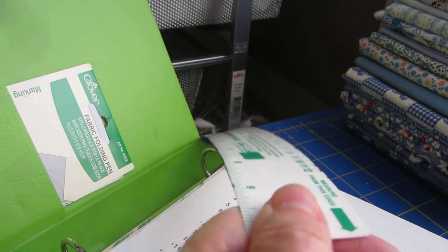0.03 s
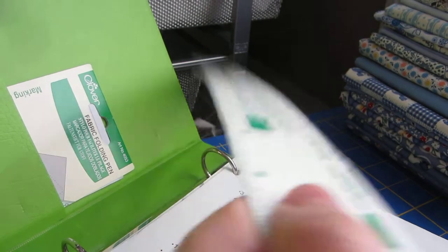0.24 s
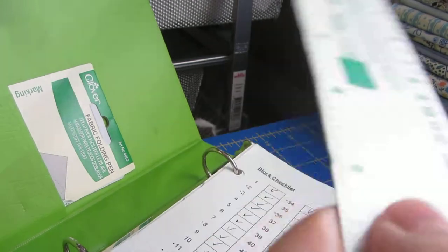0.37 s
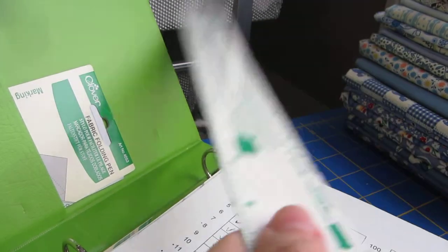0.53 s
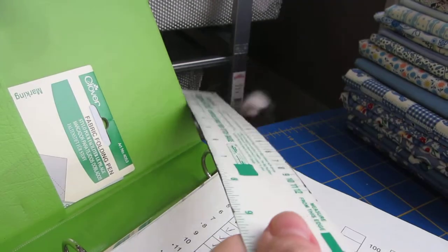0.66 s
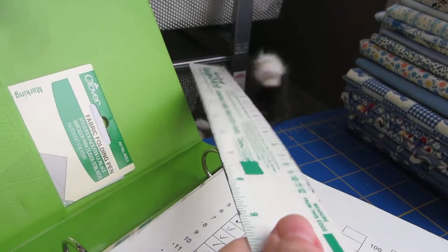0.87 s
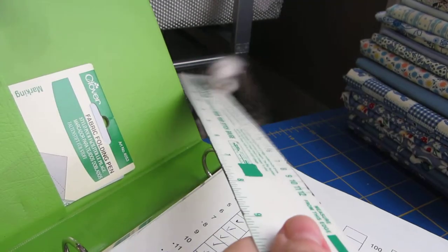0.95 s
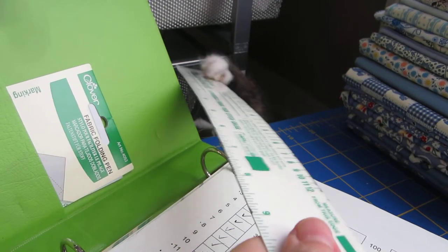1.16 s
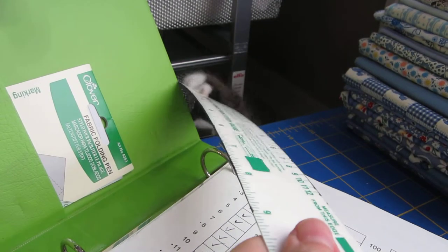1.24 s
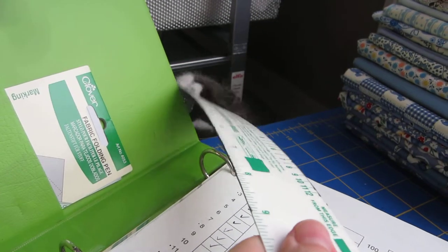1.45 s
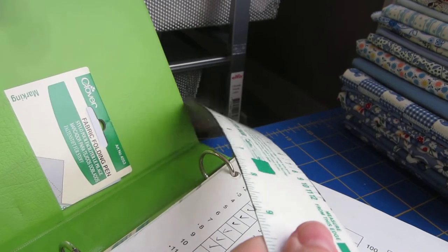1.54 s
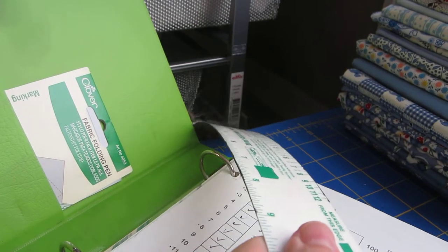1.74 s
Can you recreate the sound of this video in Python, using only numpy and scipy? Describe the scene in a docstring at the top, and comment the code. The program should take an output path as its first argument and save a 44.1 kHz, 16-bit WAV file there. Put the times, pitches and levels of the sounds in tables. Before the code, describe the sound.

A plastic ruler gives one dry crack as it flicks off a ring binder. Irregular clicking taps, a few hollow knocks and light scraping on the cover follow, close to the microphone in a quiet room.

```python
"""A bent plastic ruler slips off the edge of a ring binder with a sharp snap, swings back and taps the
cover, then skips and scrapes down it. Each snap or tap sends a bending wave along the ruler, treble
first; some taps also knock the hollow cover, which rumbles as it flexes. The scrape is a stream of
tiny slips of plastic on plastic. Heard close up in a small quiet room."""
import sys
import numpy as np
from scipy import signal
from scipy.fft import rfft, irfft, next_fast_len
from scipy.io import wavfile
from scipy.ndimage import uniform_filter1d

SR = 44100
rng = np.random.default_rng(int(sys.argv[2]) if len(sys.argv) > 2 else 0)


def wav_out(sig):
    """Save sig, one row per channel (or a flat mono array), as 16-bit PCM at SR to the path in sys.argv[1]."""
    wavfile.write(sys.argv[1], SR, np.round(np.clip(np.atleast_2d(sig).T, -1, 1) * 32767).astype(np.int16))


N = 79380

# Room tone spectrum. Each row: frequency in Hz, gain in dB.
ROOM_TONE_SPECTRUM = [(20, -17.5), (60, 6), (90, -6.5), (170, -2.5), (400, -13), (1000, -15.5),
                      (2400, -23.5), (8000, -25.5), (16000, -38)]
# Strokes of the sliding tip. Each row: start in seconds, length in seconds, body level and hiss level
# in dB before their trims, contact resonance in Hz.
STROKES = [(0.008, 0.045, -44.5, -47.5, 1740), (0.049, 0.12, -48, -48.5, 1660),
           (0.587, .016, -26, -37, 1090), (1.01, 0.072, -33.5, -44, 1460), (1.098, 0.039, -40, -53.5, 1380),
           (1.189, 0.13, -43, -52.5, 1510), (1.303, 0.049, -31.5, -40, 1520),
           (1.46, 0.056, -31.5, -31.5, 1870), (1.53, 0.021, -34.5, -30.5, 2030),
           (1.549, 0.068, -37, -41.5, 1780), (1.599, 0.058, -41, -38, 2040),
           (1.656, 0.0095, -35, -40.5, 1760), (1.688, 0.062, -36.5, -39, 2050)]
# Resonances common to all strokes. Each row: centre in Hz, width in Hz, gain in dB.
SCRAPE_RESONANCES = [(337, 120, 0), (510, 69, 2), (1090, 160, -2.5), (1650, 600, -7)]
# Hard skids of the tip. Each row: start in seconds, length in seconds, level in dB.
TIP_SKIDS = [(0.598, 0.0056, -32), (1.033, 0.0023, -38), (1.332, 0.0046, -38.5)]
# Spectra of the scrape's hiss and of a skid. Each row: frequency in Hz, gain in dB.
HISS_SPECTRUM = [(800, -4.5), (1700, -2), (2650, -2.5), (3800, 3), (5400, 0), (6300, -5), (7300, -13.5),
                 (9800, -15), (15500, -28)]
SKID_SPECTRUM = [(1000, -10.5), (3300, 1), (9000, -3.5), (15500, -23.5)]
# Taps of the tip. Each row: start in seconds, gain in dB, bass, treble and top gains in dB,
# body resonance in Hz, treble resonance in Hz, bending-wave sweep in seconds.
TIP_TAPS = [(0.0229, -0.5, -1.5, 0, -14, 1050, 3410, 0.0031), (0.5875, -1.5, 16, 7, 5, 1270, 3580, 0.00078),
            (0.6004, 13, -6, -9.5, -2, 1770, 3630, 0.001456),
            (0.6729, 7, -1.5, -7, -10, 1420, 3900, 0.0013), (0.682, -6.5, 5, -3.5, 4, 1300, 4200, 0.0028),
            (0.7196, -6, -6.5, -1.5, 4, 1375, 3870, 0.0028),
            (0.7361, -17.5, 2.5, 10.5, 14.5, 1860, 5900, 0.0022),
            (0.8581, 2, 3, -11, -5.5, 1545, 4730, 0.0027), (0.8642, 2, -2.5, 3.5, 3.5, 1630, 4640, 0.0033),
            (0.9797, -11.5, -2, 9.5, 10.5, 1750, 3480, 0.0011),
            (0.9917, 11, -6.5, -7.5, 0, 1590, 4100, 0.0026),
            (1.2135, 13, -0.5, -7.5, -11, 1480, 5140, 0.0028),
            (1.2228, 7.5, -15, -5, -14.5, 1390, 5160, 0.00222),
            (1.229, 2.5, -4.5, 3.5, -3, 1500, 2570, 0.00083), (1.3478, -6, -11, 9, 4.5, 1750, 5530, 0.0009),
            (1.4047, 6.5, -20, 2, -14, 1850, 3440, 0.0013), (1.4291, 20, -1, -5, -1, 1580, 4480, 0.0024),
            (1.4367, 10, 0, 6, -2, 1360, 2690, 0.0019), (1.706, 4.5, -10, 1, 0, 1890, 2780, 0.00053),
            (1.7592, 6, -12.5, -2.5, -5, 1600, 2470, 0.00019)]
# Spectrum of the tapped ruler. Each row: frequency in Hz, gain in dB.
RULER_SPECTRUM = [(60, -8), (250, -10), (470, -2.5), (680, -4.5), (1050, -6), (1800, -4.5), (2300, -7),
                  (3700, -14.5), (5500, -15), (7300, -25.5), (10000, -27), (15500, -41)]
# Knocks on the cover. Each row: start in seconds, gain in dB, tilt in dB per octave about 300 Hz.
COVER_KNOCKS = [(.023, -42, -3), (0.226, -32.5, 18), (.588, -30.5, 10.5), (0.602, -32.5, -6),
                (.994, -26.5, 4), (1.216, -29, 7), (1.224, -28, 11.5), (1.431, -28.5, 16),
                (1.437, -25, 1.5)]
# Modes of the cover. Each row: frequency in Hz, gain in dB, T60 in seconds.
COVER_MODES = [(120, -5, 0.11), (188, -1, 0.084), (320, 4.5, 0.041), (444, -11.5, 0.058),
               (637, -15.5, 0.031), (1123, -29, 0.077)]
# Snap spectra: direct, and evened out over all directions. Each row: frequency in Hz, gain in dB.
SNAP_DIRECT_SPECTRUM = [(40, -11.5), (120, 2), (300, -10), (450, 1), (680, -13), (850, 0.5), (1400, 5.5),
                        (1530, -11), (1680, 2), (2200, -13.5), (3000, 3), (3230, -8), (3550, 9.5),
                        (4050, -1), (4400, -7), (5400, -12.5), (6000, -3), (6700, -16.5), (8300, -7),
                        (9000, -16), (14500, -22.5), (16000, -37)]
SNAP_DIFFUSE_SPECTRUM = [(200, -7), (1350, 2.5), (2200, -8.5), (3700, -2.5), (6000, -11.5), (15500, -29)]
# Envelope of the flexing cover. Each row: time in seconds, level in dB before the trim.
FLEX_ENVELOPE = [(0.951, -56), (1.02, -52), (1.17, -59), (1.401, -63), (1.48, -56), (1.6, -53), (1.8, -60)]
# Spectrum of the flexing cover. Each row: frequency in Hz, gain in dB.
FLEX_SPECTRUM = [(20, -27.5), (48, 4.5), (90, -11.5), (170, 0.5), (300, -19), (700, -50), (2000, -110)]
# Decay of the wall reflections. Each row: frequency in Hz, T60 in seconds.
WALL_DECAY = [(100, 0.11), (500, 0.07), (1500, 0.093), (4000, 0.3), (12000, 0.15)]
# Colour of all reflections. Each row: frequency in Hz, gain in dB.
REFLECTION_SPECTRUM = [(200, 21), (1400, 6), (3000, -2), (10000, -1)]


def amp(db):
    """Decibels to gain."""
    return 10 ** (np.asarray(db) / 20)


def unit_rms(x):
    """Scale to rms 1."""
    return x / np.sqrt(np.mean(x ** 2) + 1e-20)


def along(points, hz):
    """Interpolate (Hz, value) points on a log-frequency axis."""
    point_hz, values = np.transpose(points)
    return np.interp(np.log(hz + 1), np.log(point_hz + 1), values)


def bell(hz, centre_hz, octaves=0.22):
    """Bell curve on a log-frequency axis."""
    return np.exp(-(np.log2((hz + 1) / centre_hz) / octaves) ** 2)


def filtered(x, response):
    """Apply a gain given as a function of Hz."""
    size = next_fast_len(N + SR // 2)
    return irfft(rfft(x, size) * response(np.fft.rfftfreq(size, 1 / SR)), size)[:N]


def coloured(x, spectrum):
    """Apply a (Hz, dB) spectrum."""
    return filtered(x, lambda hz: amp(along(spectrum, hz)))


def noise(spectrum):
    """Coloured noise, rms 1."""
    return unit_rms(coloured(rng.standard_normal(N), spectrum))


def burst(t60_s, size=4096):
    """Decaying noise, energy 1."""
    x = rng.standard_normal(size) * amp(-60 * np.arange(size) / SR / t60_s)
    return x / np.linalg.norm(x)


def add(track, start_s, sound):
    """Mix a sound into the track in place."""
    part = track[max(round(start_s * SR), 0):][:len(sound)]
    part += sound[:len(part)]


def swell(start_s, length_s, rise_share=0.28, fall_share=0.31):
    """Rise, hold and fall of one stroke."""
    progress = (np.arange(N) / SR - start_s) / length_s
    return np.clip(progress / rise_share, 0, 1) * np.clip((1 - progress) / fall_share, 0, 1)


def room_tone(level_db=-56):
    """Steady hiss and low rumble."""
    return amp(level_db) * noise(ROOM_TONE_SPECTRUM)


def slips(rate_per_s=2500, spread_db=5.5):
    """Tiny irregular slips of plastic on plastic, over a smooth rub."""
    onsets = rng.random(N) < rate_per_s / SR
    grains = onsets * amp(spread_db * rng.standard_normal(N)) * rng.choice([-1, 1], N)
    return unit_rms(grains) + 0.44 * rng.standard_normal(N)


def rub(resonances, order=1):
    """Slips ring through (Hz, width Hz, dB) resonances, rms 1; a higher order steepens the flanks."""
    def response(hz):
        total = 0
        for k, (centre_hz, width_hz, db) in enumerate(resonances):
            damping = 1j * hz * width_hz
            total += (-1) ** k * amp(db) * damping / (centre_hz ** 2 - hz ** 2 + damping)
        return total ** order
    return unit_rms(filtered(slips(), response))


def rasp(spectrum, grit_db=3):
    """Gritty treble of the slips, rms 1: brief resonances come and go as the contact point moves."""
    frames = signal.stft(slips(), nperseg=256)[2]
    patches = uniform_filter1d(rng.standard_normal(frames.shape), size=4, axis=0)
    patches = unit_rms(uniform_filter1d(patches, size=5, axis=1))
    grit = signal.istft(frames * amp(grit_db * patches), nperseg=256)[1][:N]
    return unit_rms(coloured(grit, spectrum))


def scrape(body_trim_db=-7.5, hiss_trim_db=-2.5, contact_db=4.5, contact_width_hz=590,
           slide_from_s=1.44, slide_db=-52):
    """The tip slides in short strokes, each with its own contact resonance, and now and then skids."""
    slide_gain = amp(slide_db) * (np.arange(N) / SR > slide_from_s)  # tip stays lightly on the cover
    body = slide_gain * rub(SCRAPE_RESONANCES)
    hiss_gain = slide_gain
    for start_s, length_s, body_db, hiss_db, contact_hz in STROKES:
        envelope = swell(start_s, length_s)
        common_ring = rub(SCRAPE_RESONANCES)
        contact_ring = amp(contact_db) * rub([(contact_hz, contact_width_hz, 0)], order=2)
        body += envelope * amp(body_db + body_trim_db) * unit_rms(common_ring + contact_ring)
        hiss_gain = np.maximum(hiss_gain, envelope * amp(hiss_db + hiss_trim_db))
    skid_gain = sum(amp(db) * swell(start_s, length_s) for start_s, length_s, db in TIP_SKIDS)
    return body + hiss_gain * rasp(HISS_SPECTRUM) + skid_gain * rasp(SKID_SPECTRUM)


def bending_wave(colour_db, sweep_s, crunch_hz, crunch_t60_s, chatter_gain=0, size=4096):
    """One contact, dispersed so the lows arrive late: a push below crunch_hz, a crunch above it."""
    hz = np.fft.rfftfreq(size, 1 / SR)
    cepstrum = irfft(np.log(amp(colour_db(hz))))
    cepstrum[1:size // 2] *= 2  # fold to minimum phase
    cepstrum[size // 2 + 1:] = 0
    colour = np.exp(rfft(cepstrum))
    delay_s = sweep_s / (1 + (hz / 2800) ** 2)
    dispersion = np.exp(-2j * np.pi * np.cumsum(delay_s) * SR / size)
    push_share = 1 / (1 + (hz / crunch_hz) ** 4)
    crunch = np.sqrt(1 - push_share) * rfft(burst(crunch_t60_s))
    chatter = chatter_gain * rfft(burst(t60_s=0.024))  # the tip buzzes after contact
    force = np.sqrt(push_share) + crunch + chatter
    fade = np.cos(np.linspace(0, np.pi / 2, size))
    return irfft(force * dispersion * colour) * fade


def taps(crunch_hz=3000, chatter_db=-11):
    """The tip strikes the cover; where and how it lands sets two resonances and a dip below each."""
    out = np.zeros(N)
    for start_s, db, bass_db, treble_db, top_db, body_hz, treble_hz, sweep_s in TIP_TAPS:
        tone = [(500, bass_db), (1200, 0), (1800, 0),
                (3500, treble_db), (5500, treble_db), (8000, top_db)]

        def colour_db(hz):
            peaks_db = 8 * bell(hz, body_hz, octaves=0.13) + 6 * bell(hz, treble_hz)
            dips_db = -8 * bell(hz, 0.58 * body_hz) - 13 * bell(hz, 0.69 * treble_hz)
            return along(RULER_SPECTRUM, hz) + along(tone, hz) + peaks_db + dips_db

        crunch_t60_s = 0.013 * 0.5 ** (db / 22)  # light taps scuff for longer
        wave = bending_wave(colour_db, sweep_s, crunch_hz, crunch_t60_s, amp(chatter_db))
        add(out, start_s, amp(db) * wave)
    return out


def cover_knocks(attack_s=0.0015):
    """The hollow cover's modes ring briefly when knocked."""
    out = np.zeros(N)
    t = np.arange(SR // 3) / SR
    attack = 1 - np.exp(-t / attack_s)
    for start_s, db, tilt_db_per_octave in COVER_KNOCKS:
        ring = 0
        for hz, mode_db, t60_s in COVER_MODES:
            onset_db = mode_db + rng.normal(0, 1) + tilt_db_per_octave * np.log2(hz / 300)
            ring += amp(onset_db - 60 * t / t60_s) * np.sin(2 * np.pi * hz * t)
        add(out, start_s, amp(db) * ring * attack)
    return out


def snap(spectrum, release_s=0.2283, release_db=16.5):
    """The tip catches once, then flies off the edge with a dry crack."""
    out = np.zeros(N)
    catch = (release_s - 0.001, release_db - 8)
    for start_s, db in [catch, (release_s, release_db)]:
        crack = bending_wave(lambda hz: along(spectrum, hz),
                             sweep_s=0.0012, crunch_hz=7500, crunch_t60_s=0.007)
        add(out, start_s, amp(db) * crack)
    return out


def cover_flex(trim_db=-1):
    """Low rumble of the cover giving way under the ruler."""
    times_s, levels_db = np.transpose(FLEX_ENVELOPE)
    envelope_db = np.interp(np.arange(N) / SR, times_s, levels_db, left=-120, right=-120)
    return amp(envelope_db + trim_db) * noise(FLEX_SPECTRUM)


def reflections(x, wall_db=-24, desk_db=-14, scatter_hz=2000):
    """A faint tail from the walls and quick treble scatter from small things on the desk."""
    hz, t, frames = signal.stft(rng.standard_normal(SR // 2), SR, nperseg=256)
    decay = amp(-60 * t / along(WALL_DECAY, hz)[:, None])
    tail = signal.istft(frames * decay, SR, nperseg=256)[1]
    highpass = signal.butter(2, scatter_hz, 'high', fs=SR)
    scatter = signal.lfilter(*highpass, burst(t60_s=0.055))
    impulse_response = np.zeros(SR // 2)
    add(impulse_response, 0.007, amp(wall_db) * tail / np.linalg.norm(tail))
    add(impulse_response, 0.003, amp(desk_db) * scatter)
    return coloured(signal.fftconvolve(x, impulse_response)[:N], REFLECTION_SPECTRUM)


def scene():
    """Ruler and binder in the room, mono."""
    binder = taps() + cover_knocks() + scrape() + cover_flex()
    direct = snap(SNAP_DIRECT_SPECTRUM) + binder
    reflected = reflections(snap(SNAP_DIFFUSE_SPECTRUM) + binder)
    return (direct + reflected + room_tone())[None]


def record(dry):
    """Steep low-pass band limit."""
    cutoff_hz = 16100
    return filtered(dry[0], lambda hz: 1 / (1 + (hz / cutoff_hz) ** 120))[None]


dry = scene()
out = record(dry)
wav_out(out)
```